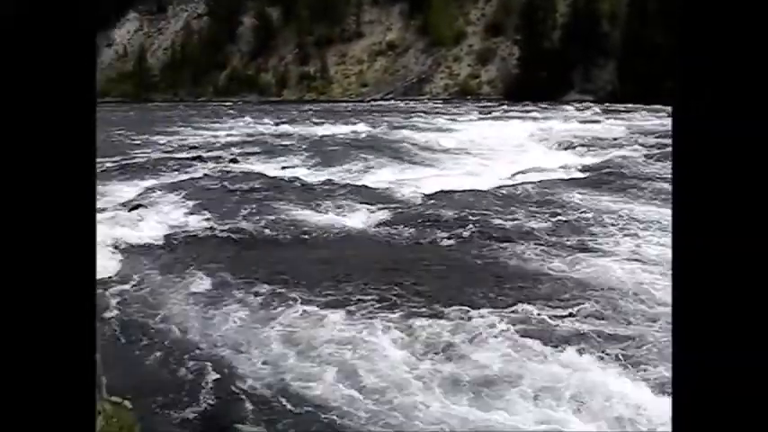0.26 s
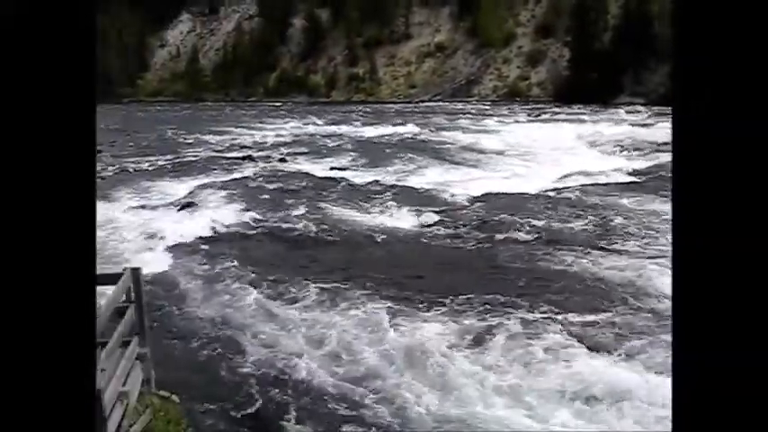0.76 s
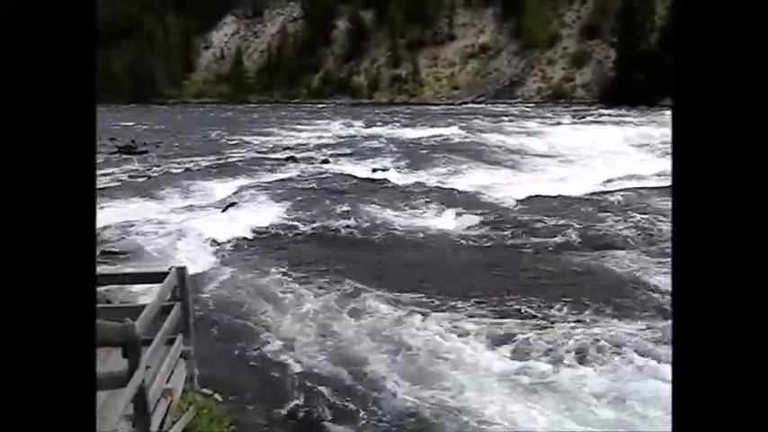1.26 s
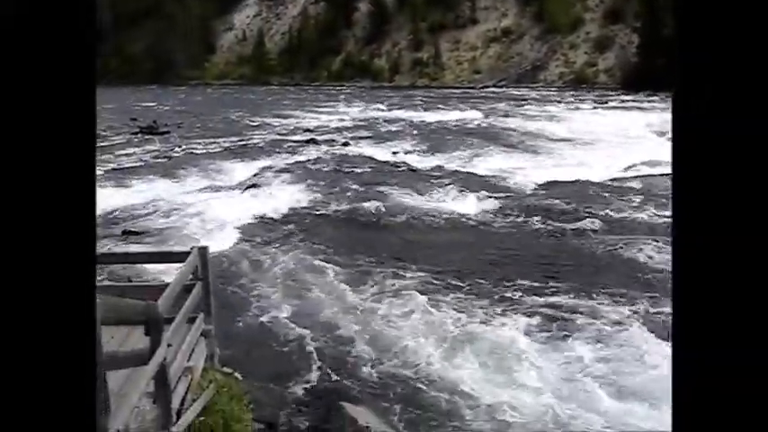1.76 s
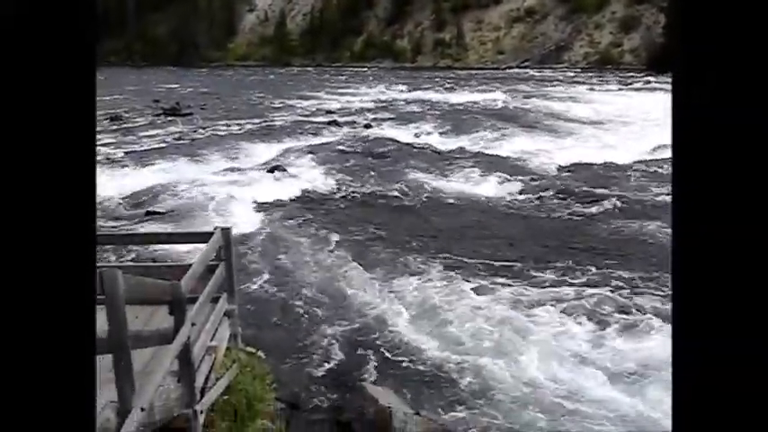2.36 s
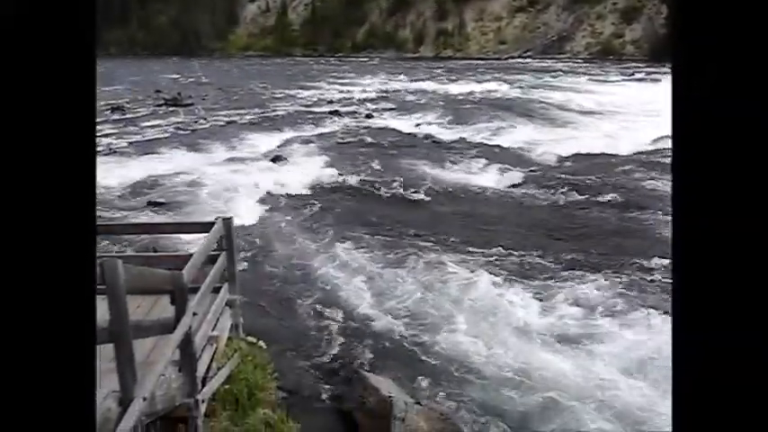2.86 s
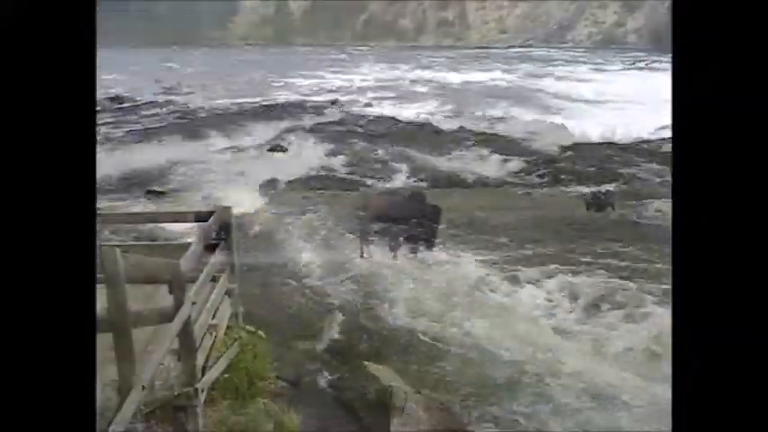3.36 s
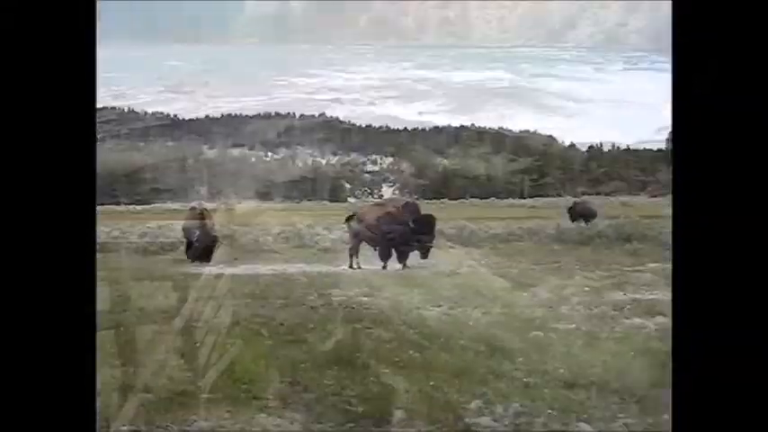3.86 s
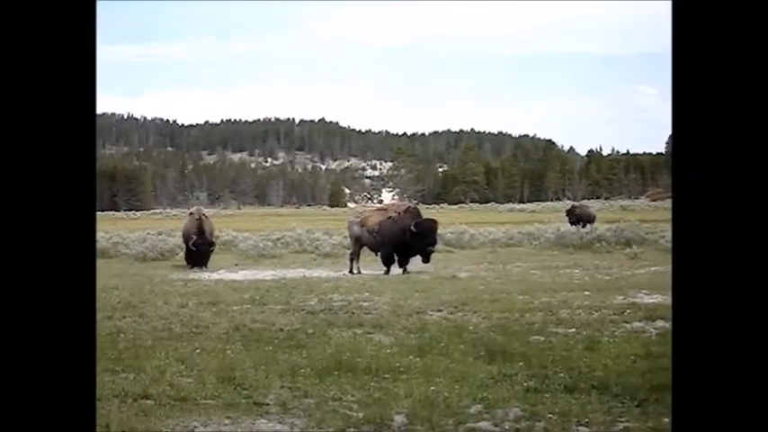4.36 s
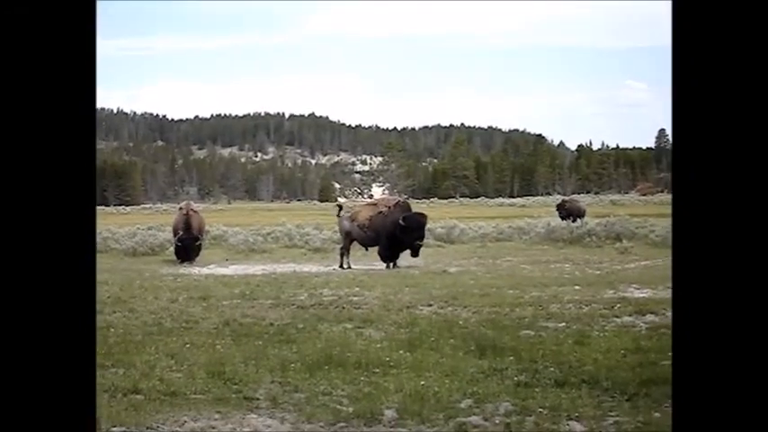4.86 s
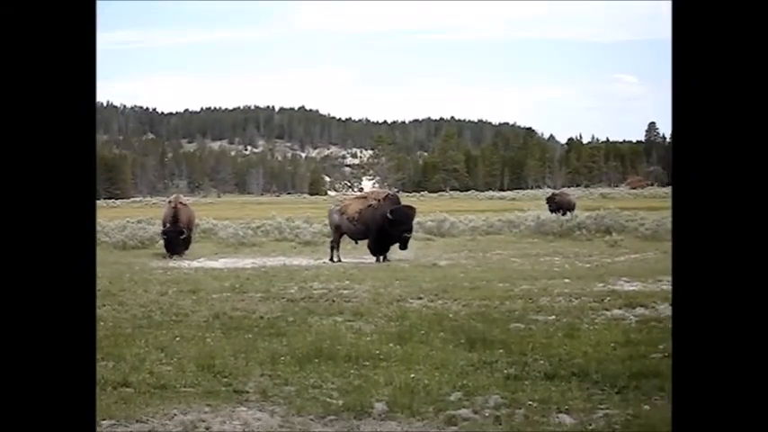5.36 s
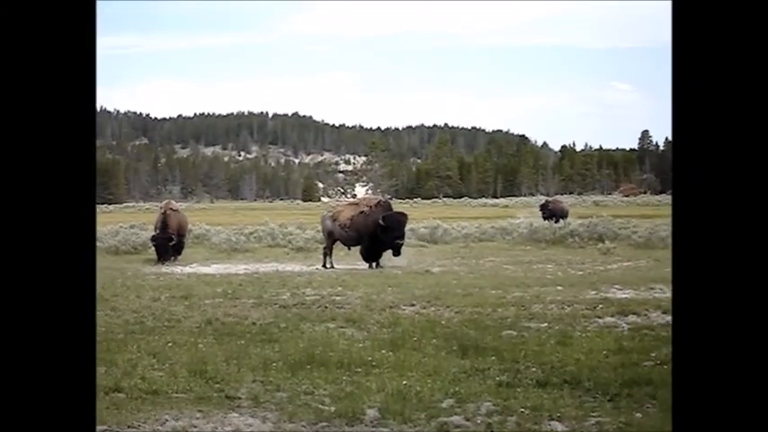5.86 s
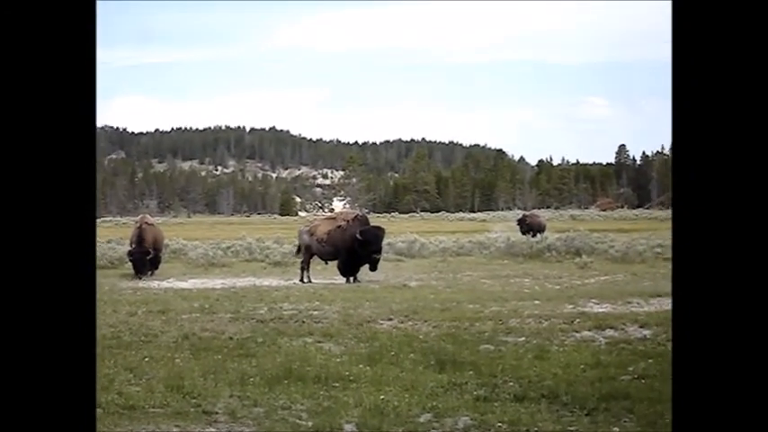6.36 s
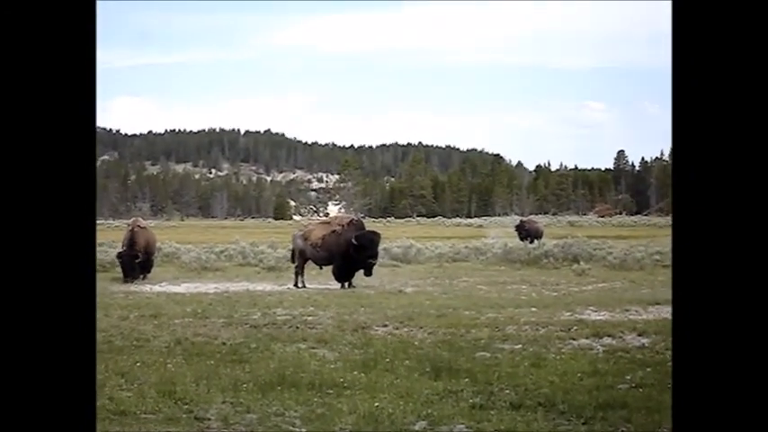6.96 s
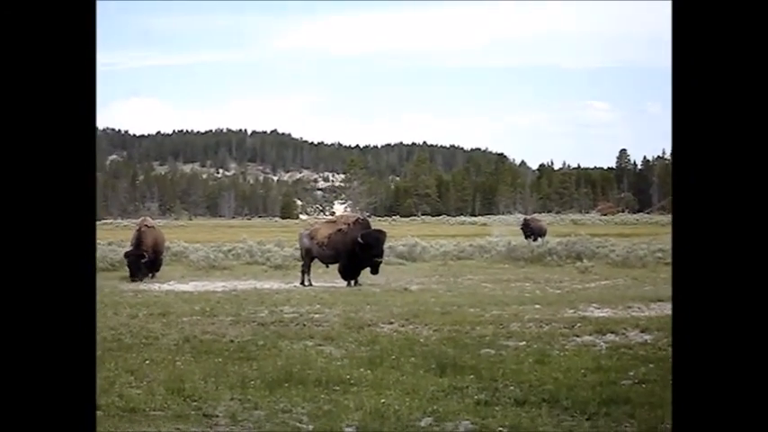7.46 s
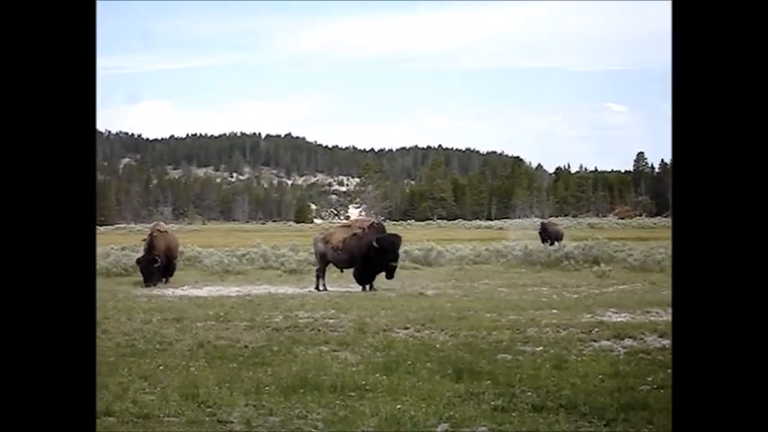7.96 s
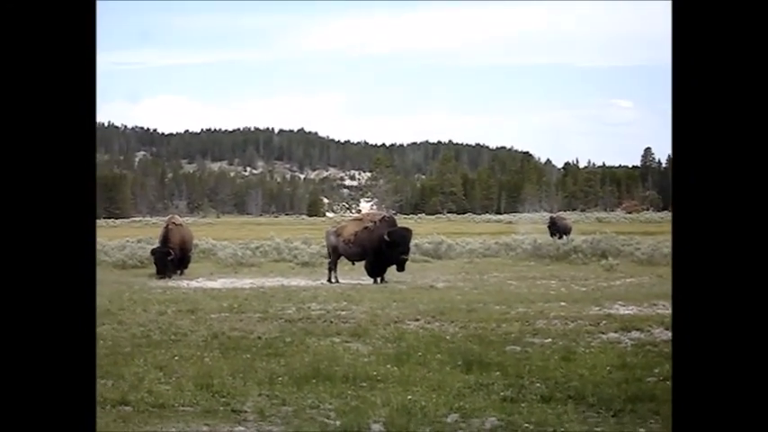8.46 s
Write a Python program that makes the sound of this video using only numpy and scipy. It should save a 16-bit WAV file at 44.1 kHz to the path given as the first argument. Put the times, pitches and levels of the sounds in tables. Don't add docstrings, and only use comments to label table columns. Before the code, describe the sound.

Loud close whitewater rapids roar steadily, then cut with a click to a very quiet meadow with distant traffic rumble and a brief whistling songbird.

```python
import sys
import numpy as np
from scipy import signal
from scipy.fft import rfft, irfft, next_fast_len
from scipy.io import wavfile

SR = 44100
rng = np.random.default_rng(int(sys.argv[2]) if len(sys.argv) > 2 else 0)


def linear_from_db(decibels):
    return 10 ** (np.asarray(decibels, float) / 20)


def log_audio(samples):
    frames = np.atleast_2d(samples).T
    limited = np.clip(frames, -1, 1)
    pcm = np.round(limited * 32767).astype(np.int16)
    wavfile.write(sys.argv[1], SR, pcm)


N = 383661

# t/s, level/dB
RIVER_SURGE = [(0, 3), (.3, -1), (.6, 0.5), (.85, 1), (1.1, 1.5), (1.45, 0.4), (1.65, -4), (2.1, 0.3),
               (2.7, -1), (2.95, 2), (3.15, -1), (3.4, 0.6), (3.65, -1.4), (4.11, -0.2)]
# f/Hz, level/dB per Hz
RIVER_SPECTRUM = [(15, -58), (25, -34), (128, -17), (205, -9), (365, -5.5), (574, -0.5), (1020, -4),
                  (2010, -5), (3000, -10.5), (4480, -14.5), (6370, -20), (8300, -27), (10300, -30.5)]
# t/s, lowest lost f/Hz, number of lone lines that outlive the loss
TREBLE_LOSSES = [(.853, 4100, 1), (3.203, 2800, 4), (3.778, 3100, 2), (4.141, 2900, 0), (4.247, 2900, 0),
                 (4.46, 3000, 0), (5.102, 2900, 0), (6.552, 2700, 0), (6.744, 2350, 4), (6.957, 3100, 2),
                 (7.043, 3300, 0), (7.277, 3000, 0), (7.746, 3050, 0), (8.664, 3000, 0)]
# t/s, lowest lost f/Hz, number of lone lines
LONG_TREBLE_LOSSES = [
    (4.898, 2950, 0),
    (4.963, 2950, 0),
]
# t/s, low f/Hz, high f/Hz, level/dB
CHANNEL_SPLITS = [
    (.0574, 6200, 7660, -39),
    (1.0544, 7500, 9800, -41),
    (1.821, 7500, 9800, -40),
    (1.821, 4100, 5180, -32),
    (7.0968, 6200, 7700, -67),
    (8.5088, 4600, 6460, -69),
]
# f/Hz, level/dB per Hz
MEADOW_SPECTRUM = [(15, -40), (30, -24), (64, -10.5), (140, -12), (300, -15.5), (600, -6), (1020, -3),
                   (1500, -8), (2200, -13.5), (2900, -21.5), (3700, -26), (5000, -28.5), (7000, -31),
                   (10300, -33.5)]
# nearest t/s, half width/s, rumble lift/dB
PASSES = [
    (4.1, .3, 2),
    (5.4, .5, 0.4),
    (7.8, 0.22, 5),
]
# nearest t/s, f/Hz, level/dB, fall before/(dB/s), fall after/(dB/s)
DRONES = [
    (4.4, 80, -55.5, 1.5, 2.8),
    (8.1, 77, -57, 25, .8),
    (5.3, 127.5, -62, 8, 6),
    (7.0, 127.5, -59, 7, 12),
    (4.4, 205, -62, 16, 12),
]
# f/Hz, level/dB
WHINE_LINES = [(5725, -81), (7395, -80), (7560, -82), (7590, -75), (7620, -68.5), (7650, -67),
               (7680, -74.5), (7875, -78), (7905, -83), (8100, -85), (9265, -84)]
# f/Hz, width/Hz, level/dB
WHINE_HUMP = (7650, 350, -72)
# t/s, low f/Hz, high f/Hz, level/dB
TICK = (6.435, 4000, 5700, -49.5)
# start t/s, length/s, f/Hz, level/dB
WHISTLES = [
    (6.42, .024, 2470, -57),
    (6.583, .046, 2970, -50.5),
    (6.657, .05, 2960, -62),
    (7.07, .065, 2950, -63),
    (7.095, .11, 2510, -61),
    (7.15, .03, 2790, -59),
    (7.18, .052, 2810, -52.5),
    (7.245, .065, 2810, -55.5),
    (7.345, .045, 2800, -60),
    (7.66, .08, 2960, -63),
]
# start t/s, length/s, first f/Hz, level/dB
CHIPS = [
    (6.443, .024, 2430, -49),
    (6.478, .016, 1960, -53),
    (6.645, .02, 2330, -53),
    (6.672, .016, 2250, -50),
    (6.69, .014, 2170, -50.5),
    (7.94, .025, 2370, -53),
    (8.12, .02, 2050, -58),
]
# start t/s, length/s, first f/Hz, last f/Hz, level/dB
SLURS = [
    (6.468, .098, 2090, 2430, -51),
    (7.195, .032, 2450, 2850, -55),
    (7.84, .085, 3560, 2950, -59),
]

SPLICE_S = 4.10918
JUMP = -.2
CUTOFF_HZ = 10130
ROAR_DB, FROTH_DB, SPRAY_DB = -28.5, -17, -23.5
FROTH_FOLLOWS, SPRAY_FOLLOWS = 0.23, -.02
RUMBLE_DB, RUSH_DB, HISS_DB = -52, -41, -57
RUSH_FOLLOWS = 0.33
IDLE_HZ, PULL_S, PULL_HZ, PULL_RISE_S = 101.5, 6.85, 36, 1.6
IDLE_DB, PULL_LIFT_DB, THROB_DB, THROB_S, THROB_PEAK_S = -62.5, 6.5, 7, .74, 5.42
SAG_HZ_PER_S, CHIP_FALL_HZ_PER_S, SLUR_EASE = 150, 13000, 2.3
CORE_S, DEPTH_DB, LONG_CORE_S, LONG_DEPTH_DB = .001, -24, .018, -60
SPARED_OCTAVES = 1.2


def rms_one(x):
    return x / np.sqrt(np.mean(x ** 2) + 1e-20)


def drift(rate_hz):
    r = np.exp(-80 * np.pi * rate_hz / SR)
    noise = rng.standard_normal(N // 40 + 2002)
    slow = signal.lfilter([1], [1, -2 * r, r * r], noise)[2000:]
    return np.interp(np.arange(N) / 40, np.arange(len(slow)), rms_one(slow))


def band(x, low_hz, high_hz):
    size = next_fast_len(len(x))
    hz = np.fft.rfftfreq(size, 1 / SR)
    inside = (hz > low_hz) & (hz < high_hz)
    return irfft(rfft(x, size) * inside, size)[:len(x)]


def patchy(source, spectrum, zones, patchy_db, flicker_hz):
    size = next_fast_len(N)
    hz = np.fft.rfftfreq(size, 1 / SR) + 1
    knots, levels = np.transpose(spectrum)
    coloured = rfft(source, size) * linear_from_db(np.interp(np.log(hz), np.log(knots), levels))
    out = np.zeros(N)
    for octave in range(5, 14):
        share = np.cos(np.pi / 2 * np.clip(np.log2(hz) - octave, -1, 1)) ** 2
        zone = next(z for z in zones[::-1] if z[0] < 2 ** octave or z is zones[0])
        low_hz, high_hz, level_db = zone
        inside = (hz > low_hz) & (hz < high_hz)
        zone_rms = np.sqrt(2 * np.sum(np.abs(coloured[inside]) ** 2)) / size
        gain = linear_from_db(level_db + patchy_db * drift(flicker_hz))
        out += irfft(coloured * share, size)[:N] / zone_rms * gain
    return out


def bubbles(per_s, cycles):
    sizes = linear_from_db(2.9 * np.minimum(rng.exponential(1, N), 5)) * rng.choice([-1, 1], N)
    born = rng.random(N) < per_s * linear_from_db(2.5 * drift(8)) / SR
    pitches = np.geomspace(150, 9600, 24)
    dealt = rng.integers(0, 24, N)
    heard = round((SPLICE_S + .1) * SR)
    out = 0
    for k, hz in enumerate(pitches):
        r = linear_from_db(-60 * hz / (cycles * SR))
        w = 2 * np.pi * hz / SR
        bursts = (sizes * born * (dealt == k))[:heard] + 1e-18
        ring = signal.lfilter([0, 1], [1, -2 * r * np.cos(w), r * r], bursts)
        out += rms_one(ring) * np.sqrt(hz)
    return np.pad(rms_one(out), (0, N - heard))


def rapids():
    surge_s, surge_levels = np.transpose(RIVER_SURGE)
    surge_db = np.interp(np.arange(N) / SR, surge_s, surge_levels)
    water = rng.standard_normal(N) + linear_from_db(-9.5) * bubbles(per_s=6000., cycles=9.2)
    zones = [(60, 400, ROAR_DB + surge_db),
             (400, 3000, FROTH_DB + FROTH_FOLLOWS * surge_db),
             (3000, 10000, SPRAY_DB + SPRAY_FOLLOWS * surge_db)]
    return patchy(water, RIVER_SPECTRUM, zones, patchy_db=0.29, flicker_hz=7.5)


def speckle(x, share, from_hz, depth_db):
    hz, t, cells = signal.stft(x, SR, nperseg=256)
    width = 4
    draw = rng.random((len(hz) // width + 1, len(t) // 2 + 1))
    draw = np.repeat(np.repeat(draw, width, axis=0), 2, axis=1)[:len(hz), :len(t)]
    odds = share * np.clip(hz / from_hz - 1, 0, 1)[:, None]
    gain = np.where(draw < odds, linear_from_db(depth_db), 1)
    return signal.istft(cells * gain, SR, nperseg=256)[1][:N]


def channel_splits():
    side, size = np.zeros(N), 2048
    for s, low_hz, high_hz, level_db in CHANNEL_SPLITS:
        start = round(s * SR) - size // 2
        burst = rms_one(band(rng.standard_normal(size), low_hz, high_hz))
        side[start:start + size] += linear_from_db(level_db) * burst * np.hanning(size)
    return side


def lose_treble(x):
    out, reach, ramp_s = x.copy(), 1500, .013
    losses = [(*row, CORE_S, DEPTH_DB) for row in TREBLE_LOSSES]
    losses += [(*row, LONG_CORE_S, LONG_DEPTH_DB) for row in LONG_TREBLE_LOSSES]
    for s, low_hz, spared, core_s, depth_db in losses:
        at = np.arange(round(s * SR) - reach, round(s * SR) + reach)
        from_core = (np.abs(at / SR - s) - core_s / 2) / ramp_s
        dip = np.cos(np.pi / 2 * np.clip(from_core, 0, 1)) ** 2
        lost = band(x[at], low_hz, SR / 2) - band(x[at], 7520, 7760)
        out[at] -= (1 - linear_from_db(depth_db)) * dip * lost
        place = (np.arange(spared) + rng.random(spared)) / max(spared, 1)
        for hz in low_hz * 2 ** (SPARED_OCTAVES * place ** 2):
            height = 2.8 * np.std(band(x[at], hz - 150, hz + 150))
            out[at] += height * np.sqrt(dip) * np.sin(2 * np.pi * hz * at / SR)
    return out


def meadow():
    t = np.arange(N) / SR
    lift_db = sum(db / (1 + ((t - s) / width) ** 2) for s, width, db in PASSES)
    zones = [(140, 500, RUMBLE_DB + lift_db),
             (500, 2000, RUSH_DB + RUSH_FOLLOWS * lift_db),
             (4200, 10000, HISS_DB)]
    return patchy(rng.standard_normal(N), MEADOW_SPECTRUM, zones, patchy_db=.5, flicker_hz=2.9)


def engines():
    t = np.arange(N) / SR
    voices = []
    for s, hz, db, before, after in DRONES:
        voices.append((hz, db - np.maximum(before * (s - t), after * (t - s))))
    effort = 1 - np.exp(-np.maximum(t - PULL_S, 0) / PULL_RISE_S)
    throb_db = THROB_DB * np.cos(2 * np.pi * (t - THROB_PEAK_S) / THROB_S)
    pull_db = PULL_LIFT_DB * np.minimum(3 * effort, 1)
    voices.append((IDLE_HZ + PULL_HZ * effort, IDLE_DB + pull_db + throb_db * (1 - effort)))
    out = np.zeros(N)
    for hz, level_db in voices:
        phase = 2 * np.pi * np.cumsum(hz + .6 * drift(3)) / SR
        out += np.sqrt(2) * linear_from_db(level_db + 2.0 * drift(7)) * np.sin(phase)
    return out


def whine():
    t = np.arange(N) / SR
    lines = sum(linear_from_db(db) * np.sin(2 * np.pi * (hz * t + rng.random())) for hz, db in WHINE_LINES)
    hz, width, level_db = WHINE_HUMP
    hump = signal.lfilter(*signal.iirpeak(hz, hz / width, SR), rng.standard_normal(N))
    return np.sqrt(2) * lines + linear_from_db(level_db) * rms_one(hump)


def progress(length):
    return np.linspace(0, 1, round(length * 1.2 * SR))


def tick():
    s, low_hz, high_hz, level_db = TICK
    size = 500
    start = round(s * SR) - size // 2
    burst = rms_one(band(rng.standard_normal(size), low_hz, high_hz))
    out = np.zeros(N)
    out[start:start + size] = linear_from_db(level_db) * np.hanning(size) * burst
    return out


def songbird():
    flutter = linear_from_db(1 + 2.0 * drift(130))
    warble_hz = 24 * drift(120)
    notes = []
    for s, length, hz, db in WHISTLES:
        notes.append((s, length, db, hz - SAG_HZ_PER_S * length * progress(length)))
    for s, length, hz, db in CHIPS:
        notes.append((s, length, db, hz - CHIP_FALL_HZ_PER_S * length * progress(length)))
    for s, length, first, last, db in SLURS:
        notes.append((s, length, db, last + (first - last) * np.exp(-SLUR_EASE * progress(length))))
    song = np.zeros(N)
    for s, length, level_db, pitch_hz in notes:
        count, start = len(pitch_hz), round((s - .1 * length) * SR)
        phase = 2 * np.pi * np.cumsum(pitch_hz + warble_hz[start:start + count]) / SR
        envelope = linear_from_db(level_db) * signal.windows.tukey(count, .4)
        song[start:start + count] += np.sqrt(2) * envelope * np.sin(phase)
    echoes = rng.standard_normal(SR // 4) * linear_from_db(-170 * np.arange(SR // 4) / SR)
    echoes[:SR // 50] = 0
    echoes *= linear_from_db(-7.5) / np.sqrt(np.sum(echoes ** 2))
    return song * flutter + signal.fftconvolve(song, echoes)[:N] + tick()


def scene():
    river = speckle(rapids(), share=.07, from_hz=3800, depth_db=-20)
    field = speckle(meadow() + engines() + songbird(), share=.07, from_hz=3000, depth_db=-20)
    field = field + whine()
    river = lose_treble(band(river, 0, CUTOFF_HZ))
    field = lose_treble(band(field, 0, CUTOFF_HZ))
    cut = round(SPLICE_S * SR)
    to_cut = np.arange(cut) - cut + 1
    river[:cut] += (JUMP - river[cut - 1]) * np.exp(to_cut / 12)
    mid = np.concatenate([river[:cut], field[cut:]])
    return mid + channel_splits() * [[1], [-1]]


def top_cut(x):
    return signal.sosfilt(signal.butter(12, 16000, fs=SR, output="sos"), x)


def record(dry):
    return top_cut(dry)


dry = scene()
out = record(dry)
log_audio(out)
```